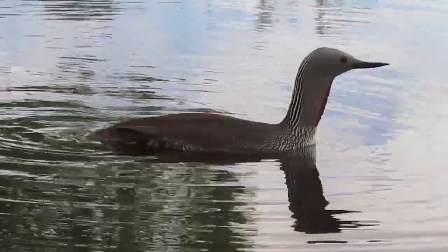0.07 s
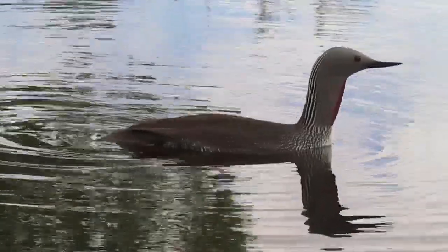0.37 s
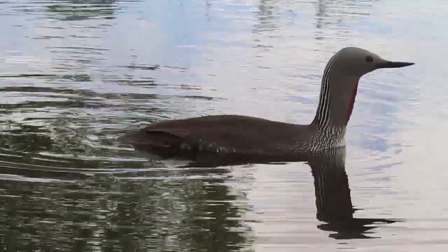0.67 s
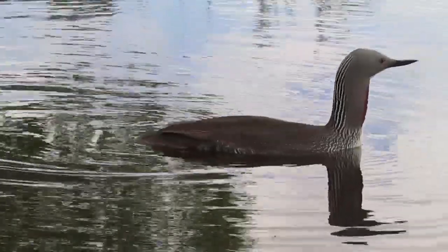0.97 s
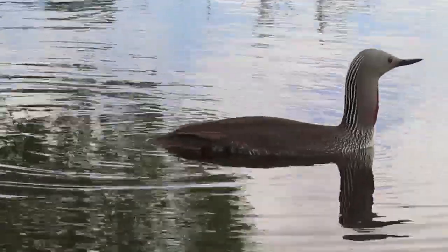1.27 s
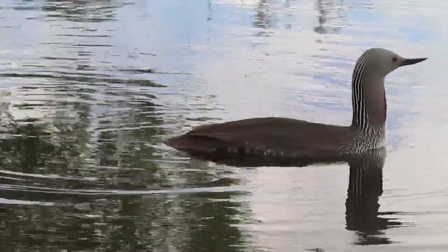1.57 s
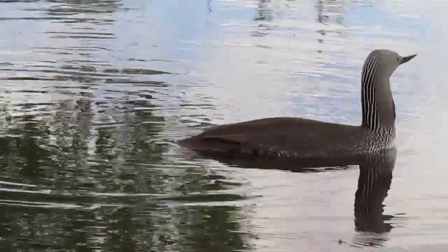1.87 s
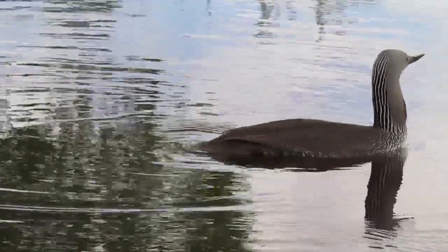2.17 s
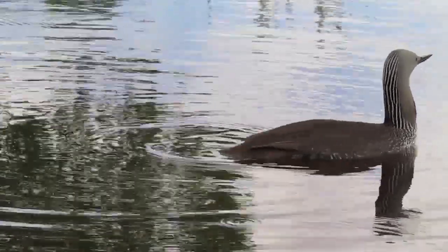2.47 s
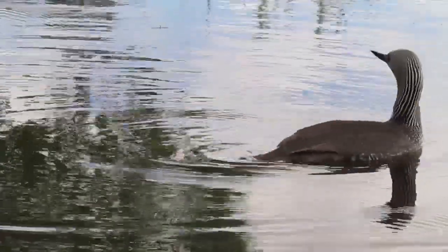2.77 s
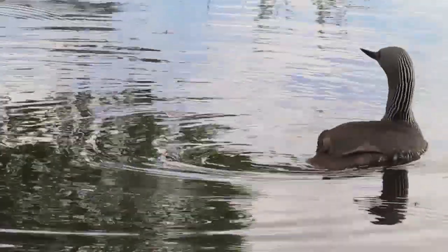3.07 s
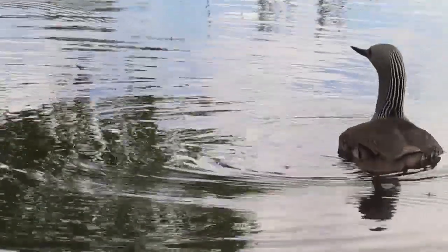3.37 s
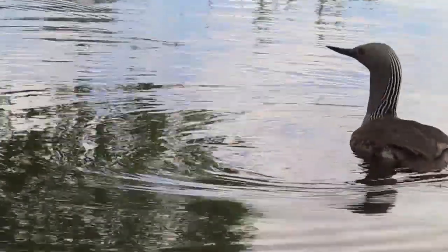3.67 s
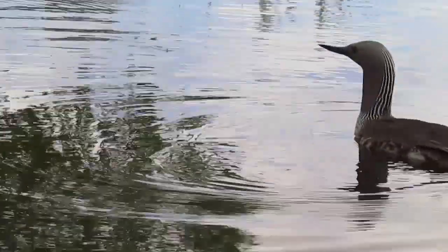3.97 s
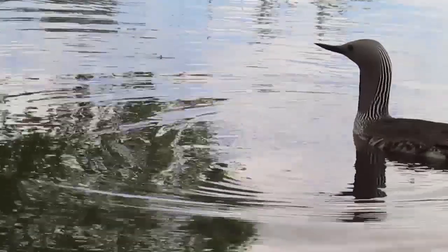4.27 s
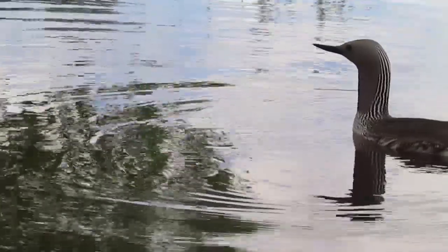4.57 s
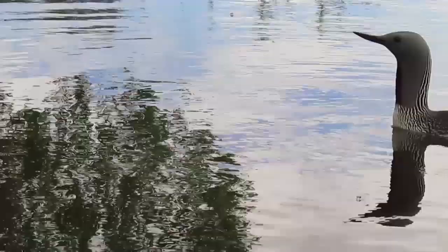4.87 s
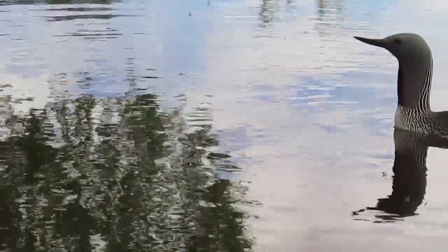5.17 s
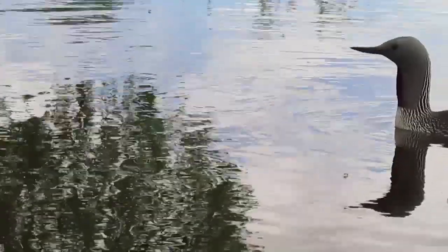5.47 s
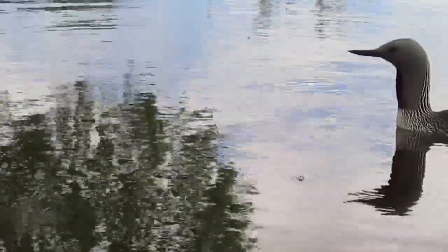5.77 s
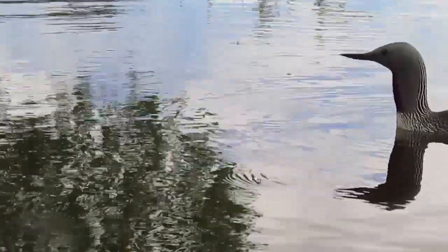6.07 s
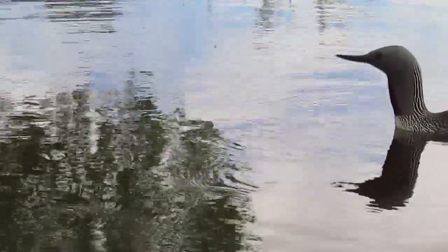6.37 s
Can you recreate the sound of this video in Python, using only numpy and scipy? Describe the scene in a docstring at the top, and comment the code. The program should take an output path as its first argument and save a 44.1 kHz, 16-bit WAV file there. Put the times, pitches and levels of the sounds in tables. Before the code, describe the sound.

A water bird chatters a rapid run of shrill, echoing whistles, then light wind continues in distant trees with a soft double plop.

```python
"""A diver, a water bird, calls on a still lake: a quick trill of arched whistles from a vibrating membrane,
speeding up and sinking at its end, over a short falling wail that breaks hoarse. Water and wooded shore
echo the calls. Later a small bird peeps far off and two bubbles plop softly.
Light wind sighs in far trees, stirs the leaves and rumbles low."""
import sys
import numpy as np
from scipy import signal
from scipy.fft import rfft, irfft
from scipy.io import wavfile

SR = 44100
rng = np.random.default_rng(int(sys.argv[2]) if len(sys.argv) > 2 else 0)


def transcribe(signal):
    """Save signal, clipped to [-1, 1], as a 16-bit WAV file at the path in sys.argv[1]."""
    frames = np.atleast_2d(signal).T
    limited = np.clip(frames, -1, 1)
    pcm = np.round(limited * 32767).astype(np.int16)
    wavfile.write(sys.argv[1], SR, pcm)


N = 292383
TIME = np.arange(N) / SR
BIN_HZ = np.fft.rfftfreq(N, 1 / SR)


# trill notes: middle_s, top_hz, drive_db
TRILL_NOTES = [(0.092, 3155, -43), (.209, 3236, -38.5), (.329, 3293, -35.5), (0.4505, 3230, -36),
               (0.5675, 3270, -34.5), (.684, 3327, -33.5), (.798, 3274, -34.5), (0.9113, 3270, -33.5),
               (1.0187, 3200, -33), (1.1219, 3185, -38.5), (1.2169, 3135, -37.5), (1.301, 2986, -39.5),
               (1.374, 2900, -45.5), (1.4421, 2713, -52.5)]
# throat and bill response: frequency_hz, gain_db
THROAT_RESPONSE = [(1000, -22), (1900, -14), (2650, -22), (3200, -17), (4100, -12.5), (4700, -4),
                   (5400, -1.5), (6400, -3.5), (7200, -11.5), (8200, -28), (9400, -32), (10000, -36),
                   (10900, -30.5), (12900, -42.5), (14500, -30)]

def trill(sag=.155, end_sag=.076, leap=.55, leap_s=.00085, jitter=.0031, ramp_s=.001, edge_db=1.0,
          flutter_db=1.5, shimmer_db=3.0, crackle_s=.0073, soft_db=-34.5):
    """Each note is one arch of membrane tension: pitch leaps, rounds over and drops; the throat filters."""
    waver, flutter, grit, shimmer = drift(800), drift(120), drift(1230), drift(240)
    membrane = np.zeros(N)
    for middle_s, top_hz, drive_db in TRILL_NOTES:
        length_s = note_length(middle_s)
        near = np.abs(TIME - middle_s) < .75 * length_s
        t = TIME[near] - middle_s
        arch = t / (length_s / 2)
        since_s, until_s = t + length_s / 2, length_s / 2 - t
        tension = -sag * arch ** 2 - end_sag * np.maximum(arch, 0) ** 8 - leap * step(-since_s / leap_s - 1)
        phase = phase_of(top_hz * np.exp(tension + jitter * waver[near]))
        # hardest push at both ends, where the vibration breaks up
        push = from_db(drive_db + edge_db * arch ** 2 + flutter_db * flutter[near])
        gate = step(since_s / ramp_s) * step(until_s / ramp_s)
        rough = .056 + .53 * np.exp(-np.abs(since_s) / crackle_s)
        rough += .22 * np.exp(-np.abs(until_s) / crackle_s)
        # soft notes keep their fundamental while the overtones fade
        hold_db = max(soft_db - drive_db, 0)
        fundamental = from_db(hold_db) * np.sin(phase)
        upper = sum(np.sin(k * phase + .23 * grit[near]) for k in (3, 4))
        upper *= from_db(shimmer_db * shimmer[near] + .38 * hold_db)
        tone = fundamental + np.sin(2 * phase) + upper
        membrane[near] += np.sqrt(2) * push * gate * (1 + rough * grit[near]) * tone
    return irfft(rfft(membrane) * from_db(at_hz(THROAT_RESPONSE, BIN_HZ)), N)


def note_length(middle_s, full_s=.046, spent_s=1.56, tiring=4.4):
    """Notes shorten ever faster as the bird runs out of air."""
    return full_s * max(1 - (middle_s / spent_s) ** tiring, .1)


def rasps(gain_db=-19, lead_s=.0029, width_s=.00603, slack_hz=1900, jitter=.1077, tighten=.1524,
          hiss_db=-10):
    """Before each note locks, the slack membrane rattles at a low, unsteady pitch, rising as it tightens."""
    gate, tension = np.zeros(N), np.zeros(N)
    for middle_s, _, drive_db in TRILL_NOTES:
        rasp_s = middle_s - note_length(middle_s) / 2 - lead_s
        gate += from_db(drive_db) * bump(rasp_s, width_s)
        tension += tighten * (TIME - rasp_s) / (2 * width_s) * bump(rasp_s, 2 * width_s)
    phase = phase_of(slack_hz * (1 + tension + jitter * drift(733)))
    rattle = sum(from_db(db) * np.sin(k * phase) for k, db in enumerate([-2.5, 2, -27, -22, -18], 1))
    hiss = from_db(hiss_db) * band_noise(3000, 11500)
    return from_db(gain_db) * gate * (rms_one(rattle) + hiss)


# wail partials: harmonic, relative_db
WAIL_HARMONICS = [(2, -20), (3, -25), (4, 0), (5, -26), (6, -24.5), (7, -28), (8, -30), (9, -33), (10, -37),
                  (11, -49), (12, -47)]

def wail(start_hz=832, held_hz=807, slide_s=.07, jitter=.016, base_db=-45.5, swell_db=6.5,
         break_s=.157, drop_hz=28.17, loss_db=4.5, end_s=.29, release_s=.017, hiss_db=-11,
         shut_hz=5800, open_hz=6280, resonance_db=12, width_hz=330, flicker_db=5.0, spread_db=4):
    """A clear cry slides down, swells once, then breaks into a lower, weaker, hoarse tail."""
    t = TIME[:SR // 2]
    broken = step((t - break_s) / .0059)
    pitch_hz = held_hz + (start_hz - held_hz) * np.exp(-(t / slide_s) ** 2) - drop_hz * broken
    rough = .12 + 1.01 * broken
    phase = phase_of(pitch_hz * (1 + jitter * rough * drift(290, len(t))))
    # growing strain brings out the upper partials; the opening bill lifts the resonance
    strain_db_per_octave = np.interp(t, [0, .18], [-3, 8.5])
    resonance_hz = shut_hz + (open_hz - shut_hz) * step((t - .065) / .01)
    strongest = max(WAIL_HARMONICS, key=lambda row: row[1])[0]
    tone = np.zeros(len(t))
    for k, relative_db in WAIL_HARMONICS:
        lift_db = resonance_db * np.exp(-.5 * ((k * pitch_hz - resonance_hz) / width_hz) ** 2)
        lift_db += strain_db_per_octave * max(np.log2(k / strongest), 0)
        lift_db += (flicker_db * drift(21, len(t)) + spread_db * broken) * (k != strongest)
        tone += from_db(relative_db + lift_db) * np.sin(k * phase)
    hiss = from_db(hiss_db) * rough * band_noise(1600, 6600)[:len(t)]
    level_db = base_db + swell_db * bump(middle_s=.128, width_s=.021)[:len(t)] - loss_db * broken
    envelope = from_db(level_db) * step((end_s - t) / release_s)
    return np.pad(envelope * (np.sqrt(2) * tone + hiss), (0, N - len(t)))


def echoes(x, wet_db, t60_s, build_s):
    """Countless faint returns from water, banks and trees, partly shared by both ears."""
    t = TIME[:SR]
    shared, left, right = rng.standard_normal((3, len(t)))
    envelope = from_db(-60 * t / t60_s) * (1 - np.exp(-t / build_s))
    response = (np.array([left, right]) + shared) * envelope
    response /= np.sqrt(np.sum(response ** 2) / 2)
    return from_db(wet_db) * signal.fftconvolve(x[None], response, axes=1)[:, :N]


def far_shore(x, cutoff_hz=3900):
    """Long, dull echo from across the lake; the air absorbs the highs."""
    dull = signal.sosfilt(signal.butter(8, cutoff_hz, fs=SR, output="sos"), x)
    return echoes(dull, wet_db=-11.5, t60_s=1.9, build_s=.03)


def sheen(x, cutoff_hz=8400):
    """Reeds and ripples scatter the highest overtones into a short wash."""
    bright = signal.sosfilt(signal.butter(8, cutoff_hz, "high", fs=SR, output="sos"), x)
    return echoes(bright, wet_db=-5, t60_s=.34, build_s=.002)


# bubbles: start_s, pitch_hz, level_db, t60_s
BUBBLES = [(4.2954, 730, -35, 0.012), (4.3265, 830, -49, 0.019)]

def plops(rise_s=.0017, climb_per_s=3.0):
    """Each trapped bubble rings for a few cycles, rising in pitch."""
    out = np.zeros(N)
    for start_s, pitch_hz, level_db, t60_s in BUBBLES:
        t = np.clip(TIME - start_s, 0, .2)
        envelope = 2 * from_db(level_db - 60 * t / t60_s) * (1 - np.exp(-t / rise_s))
        out += envelope * np.sin(2 * np.pi * pitch_hz * t * (1 + climb_per_s * t))
    return out


# small bird's note: middle_s, length_s, top_hz, level_db
PEEP_NOTE = (4.003, .04, 7450, -72.5)

def peep(sag=.12, jitter=.022):
    """A far small bird gives one thin, falling, slightly buzzy note."""
    middle_s, length_s, top_hz, level_db = PEEP_NOTE
    arch = np.clip((TIME - middle_s) / (length_s / 2), -2, 2)
    pitch_hz = top_hz * (1 - sag * (arch + 1) ** 2 / 4 + jitter * drift(300))
    return from_db(level_db) * np.exp(-arch ** 4) * np.sin(phase_of(pitch_hz))


# wind in far trees: frequency_hz, relative_db
SIGH_SPECTRUM = [(150, -33), (260, -5), (400, -3), (650, -1), (900, -1.34), (1250, -4.5), (1900, -7.5),
                 (2400, -13), (3300, -13.5), (3950, -15), (4600, -21.5), (6500, -25), (9000, -28.5),
                 (15500, -32)]
# low wind: frequency_hz, relative_db
RUMBLE_SPECTRUM = [(20, -45), (30, -31), (38, -9), (50, -8.5), (65, -3), (82, 1.5), (110, -3.5),
                   (160, -5.5), (230, -11.5), (330, -23), (600, -51.5)]
# buffets of air: middle_s, width_s, level_db
AIR_BUFFETS = [(4.572, 0.015, -50), (4.64, 0.028, -51.5)]

def wind(sigh_db=-59, rumble_db=-60, wander_db=.65):
    """Moving air sighs steadily in far trees over a low rumble and two soft buffets."""
    sigh = from_db(sigh_db) * open_air(SIGH_SPECTRUM)
    rumble = from_db(rumble_db + wander_db * drift(5)) * open_air(RUMBLE_SPECTRUM)
    push = sum(from_db(level_db) * bump(middle_s, width_s) for middle_s, width_s, level_db in AIR_BUFFETS)
    return sigh + rumble + push * band_noise(83, 109)


# likeness between the ears: frequency_hz, coherence
EAR_COHERENCE = [(60, 1), (130, 0.8268), (290, 0.54), (640, 0.72), (1400, 0.47), (3100, 0.5), (6800, 0.32),
                 (15000, -0.15)]
# balance between the ears: frequency_hz, left_minus_right_db
EAR_BALANCE = [(60, 1), (110, 0), (200, 2.5), (380, 3), (700, 5), (2400, 5), (4400, 3.5), (8100, 1.5),
               (15000, .5)]

def open_air(spectrum):
    """Coloured stereo noise, most alike between the ears in the bass; unit rms in the middle."""
    mid, side = rfft(rng.standard_normal((2, N)))
    coherence = np.clip(at_hz(EAR_COHERENCE, BIN_HZ), 0, 1)
    ear_sign = np.array([[1], [-1]])
    pair = np.sqrt(1 + coherence) * mid + np.sqrt(1 - coherence) * side * ear_sign
    gain_db = at_hz(spectrum, BIN_HZ) + ear_sign * at_hz(EAR_BALANCE, BIN_HZ) / 2
    noise = irfft(pair * from_db(gain_db), N)
    return noise / np.std(noise.mean(axis=0))


# stirs of the breeze: middle_s, level_db
BREEZE_STIRS = [(2.0, -83), (4.25, -83), (5.7, -80), (6.6, -86)]

def leaves(calm_db=-93, stir_s=.27, flicker_db=1.2, band_hz=(3800, 7500)):
    """A faint, flickering rustle swells with each stir of the breeze."""
    flicker = from_db(flicker_db * drift(30))
    stirs = sum(from_db(level_db) * bump(middle_s, stir_s) for middle_s, level_db in BREEZE_STIRS)
    rustle = np.array([band_noise(*band_hz), band_noise(*band_hz)])
    return (from_db(calm_db) + stirs) * flicker * rustle


def place(x, pan_db, lag_ms):
    """Mono to stereo: positive pan favours the left ear; the right ear lags."""
    late = irfft(rfft(x) * np.exp(-2j * np.pi * BIN_HZ * lag_ms / 1000), N)
    return np.array([x * from_db(pan_db / 2), late * from_db(-pan_db / 2)])


def band_noise(low_hz, high_hz):
    """Band-passed noise, unit rms."""
    band = signal.butter(2, [low_hz, high_hz], "band", fs=SR, output="sos")
    return rms_one(signal.sosfilt(band, rng.standard_normal(N)))


def drift(rate_hz, size=N):
    """Random wander, mostly below rate_hz, unit rms."""
    hz = np.fft.rfftfreq(size, 1 / SR)
    return rms_one(irfft(rfft(rng.standard_normal(size)) / (1 + (hz / rate_hz) ** 2), size))


def at_hz(points, hz):
    """Interpolate a table over log frequency."""
    known_hz, values = np.transpose(points)
    return np.interp(np.log(np.maximum(hz, 1)), np.log(known_hz), values)


def phase_of(pitch_hz):
    """Running phase in radians."""
    return 2 * np.pi * np.cumsum(pitch_hz) / SR


def bump(middle_s, width_s):
    """Gaussian of height 1."""
    return np.exp(-.5 * ((TIME - middle_s) / width_s) ** 2)


def step(x):
    """Smooth switch from 0 to 1."""
    return .5 + .5 * np.tanh(x / 2)


def from_db(db):
    """Decibels to gain."""
    return 10 ** (np.asarray(db) / 20)


def rms_one(x):
    """Scale to unit rms."""
    return x / np.sqrt(np.mean(x ** 2) + 1e-20)


def scene():
    """Diver, small bird and bubbles with their echoes, over wind and leaves."""
    notes, cry, small_bird, bubbles = trill() + rasps(), wail(), peep(), plops()
    birds = place(notes, pan_db=.2, lag_ms=.017)
    birds += echoes(notes, wet_db=-10, t60_s=1.1, build_s=.002)
    birds += far_shore(notes) + sheen(notes)
    birds += echoes(notes, wet_db=-12, t60_s=.06, build_s=.001)  # short blur off the ripples
    birds += place(cry, pan_db=-2, lag_ms=.0018)
    birds += echoes(cry, wet_db=-5.5, t60_s=1.05, build_s=.015)
    birds += small_bird + echoes(small_bird, wet_db=4, t60_s=1.1, build_s=.0176)
    water = place(bubbles, pan_db=9.5, lag_ms=.02) + echoes(bubbles, wet_db=-3, t60_s=.81, build_s=.002)
    return birds + water + wind() + leaves()


def record(dry, cutoff_hz=15800):
    """Steep low-pass."""
    return signal.sosfilt(signal.ellip(12, .1, 80, cutoff_hz, fs=SR, output="sos"), dry)


dry = scene()
out = record(dry)
transcribe(out)
```